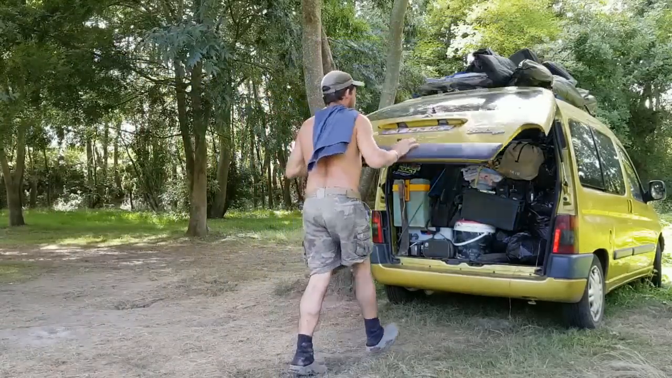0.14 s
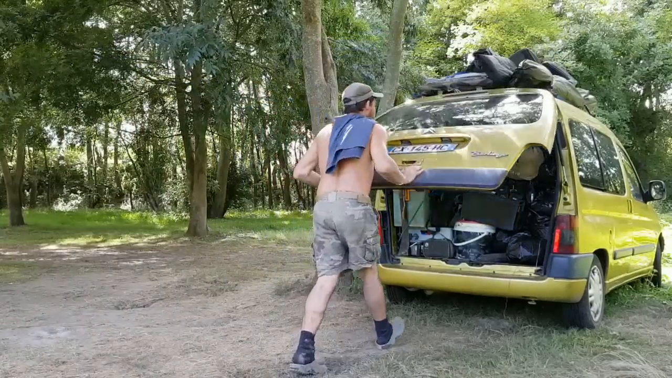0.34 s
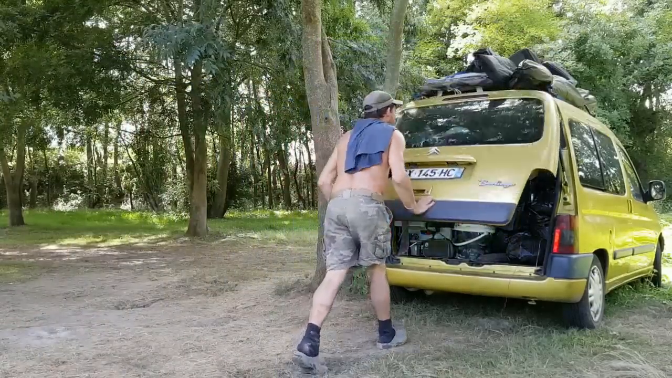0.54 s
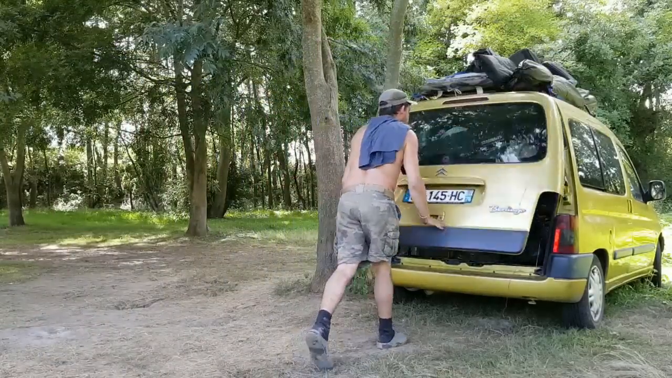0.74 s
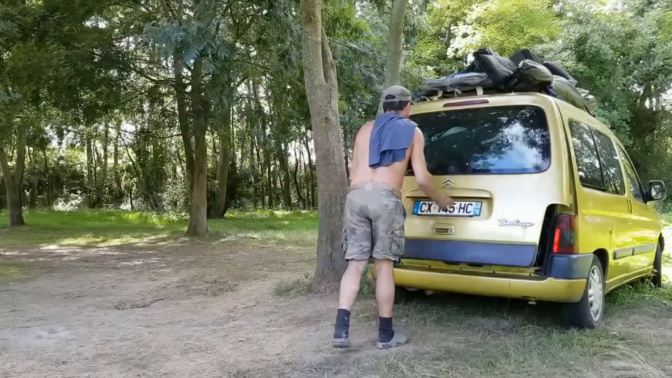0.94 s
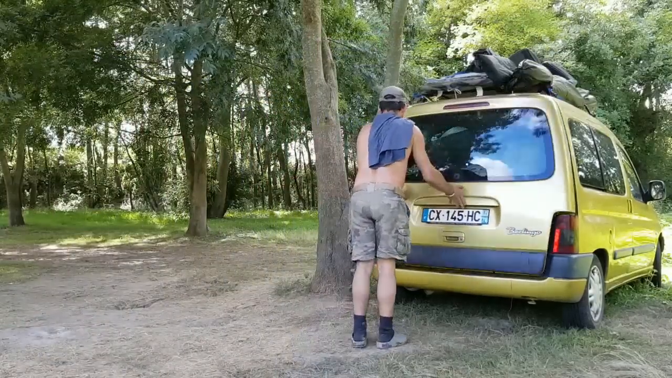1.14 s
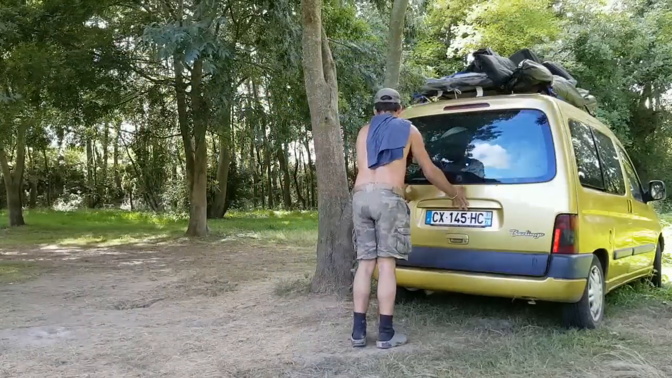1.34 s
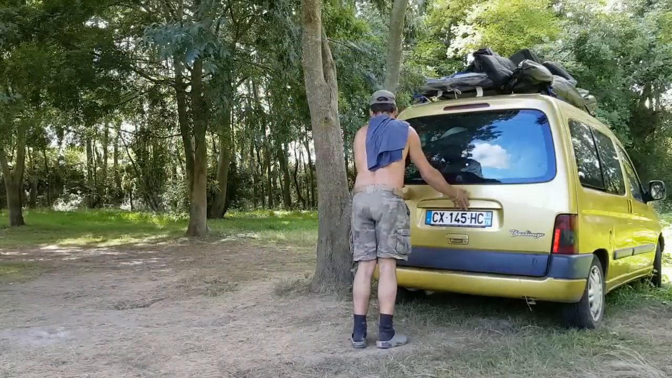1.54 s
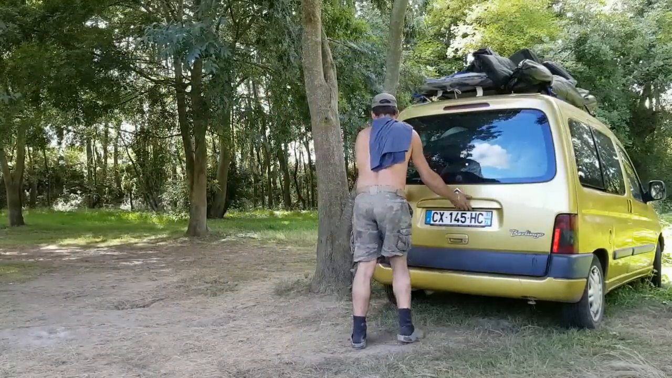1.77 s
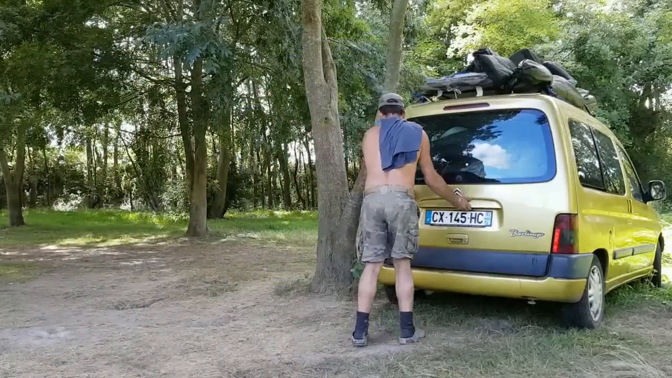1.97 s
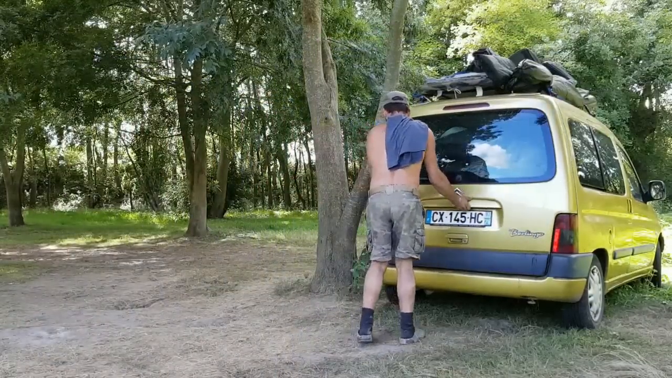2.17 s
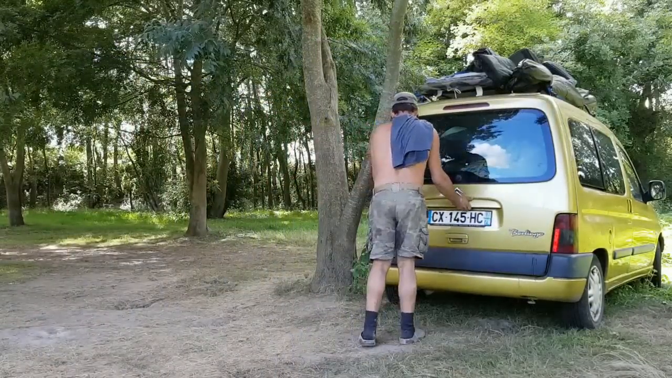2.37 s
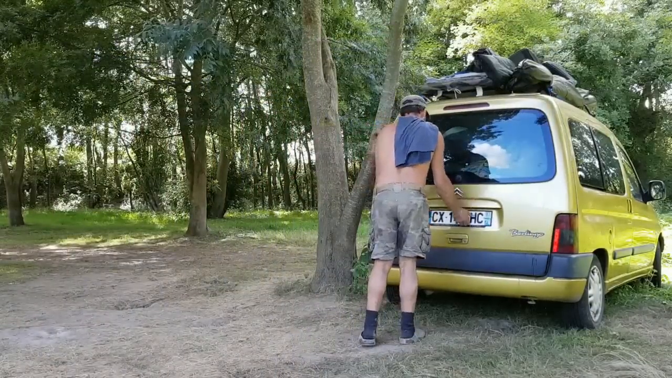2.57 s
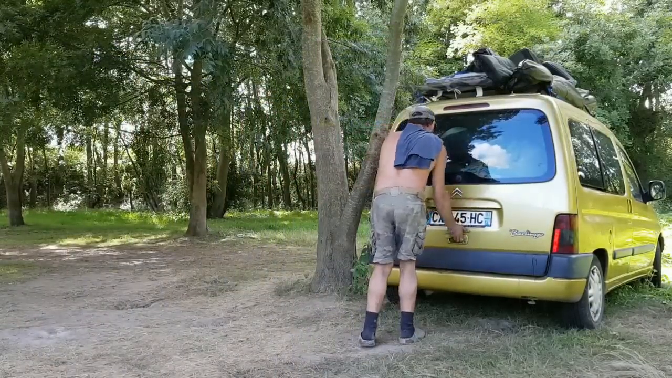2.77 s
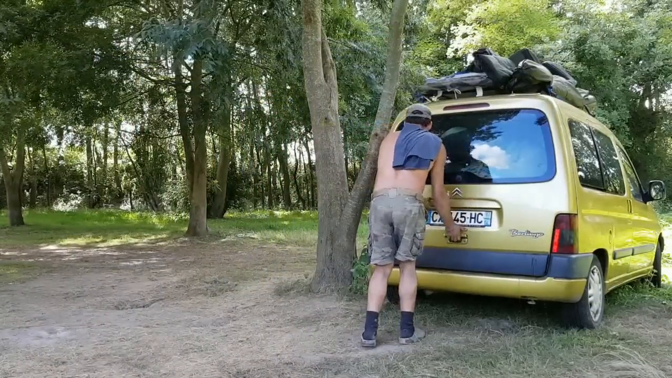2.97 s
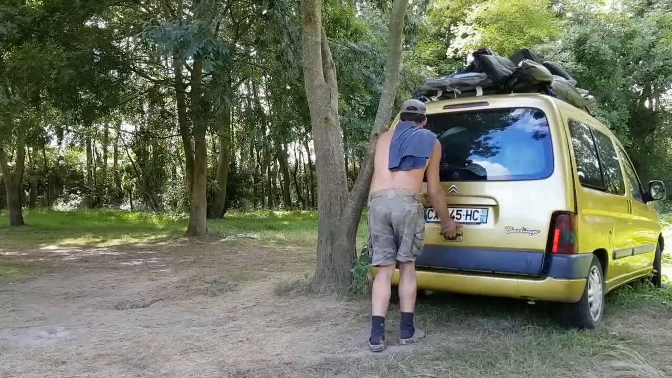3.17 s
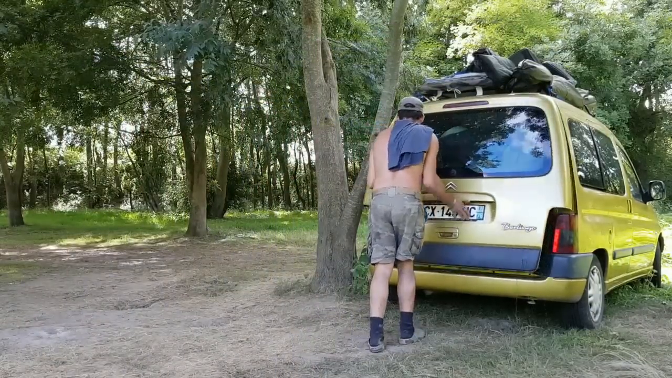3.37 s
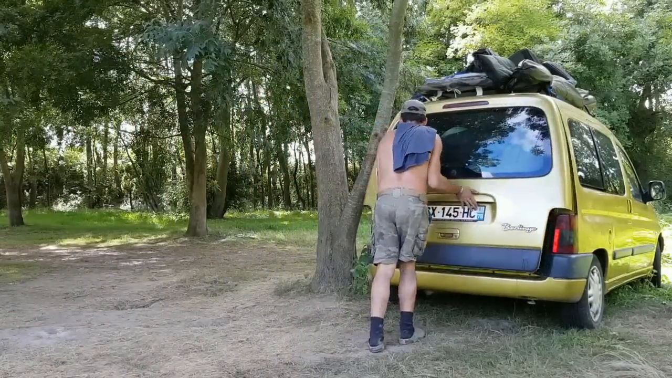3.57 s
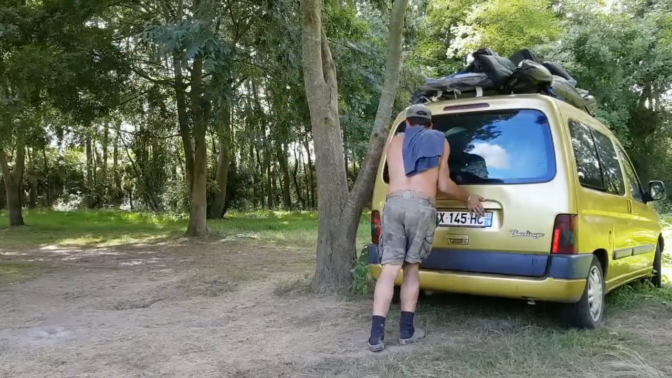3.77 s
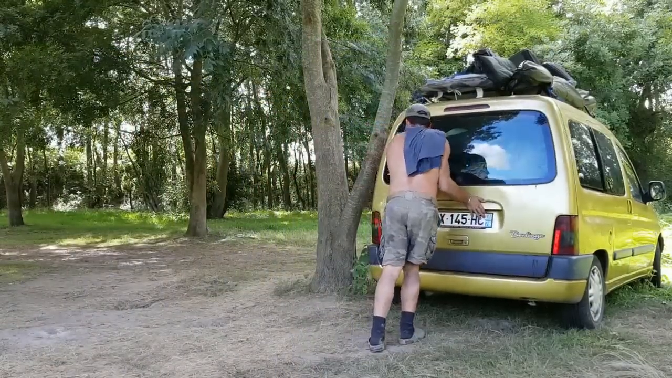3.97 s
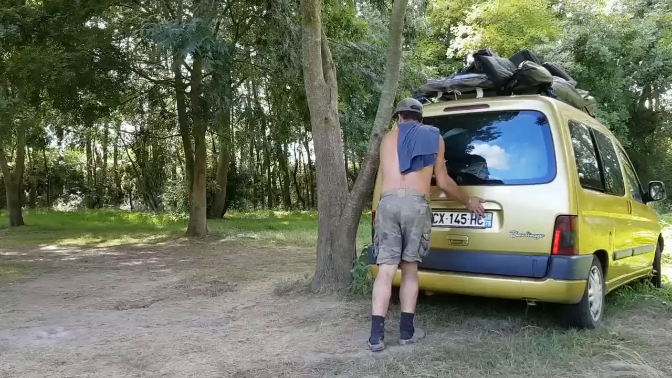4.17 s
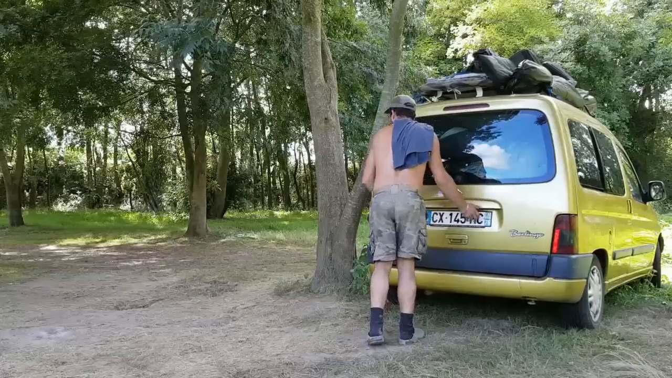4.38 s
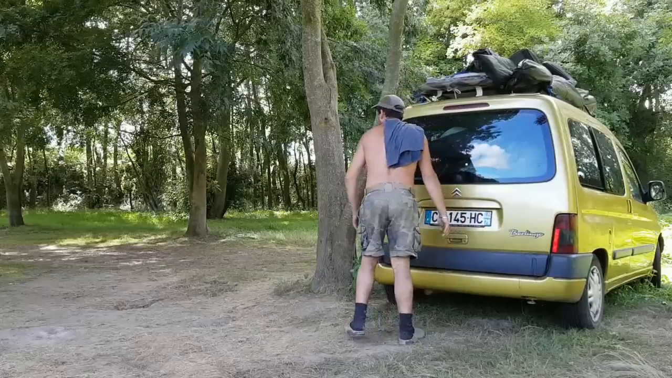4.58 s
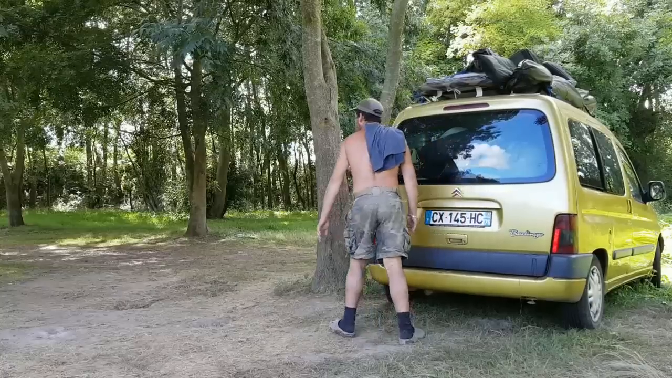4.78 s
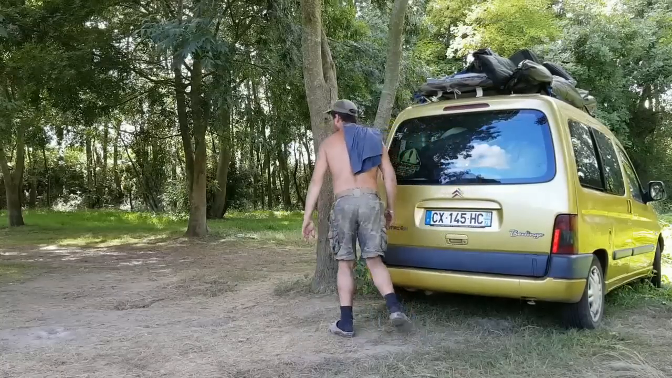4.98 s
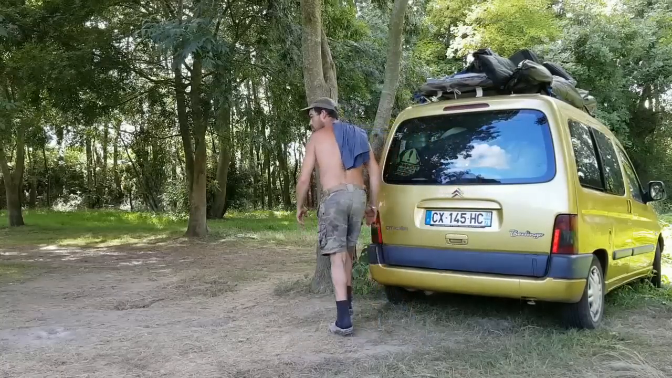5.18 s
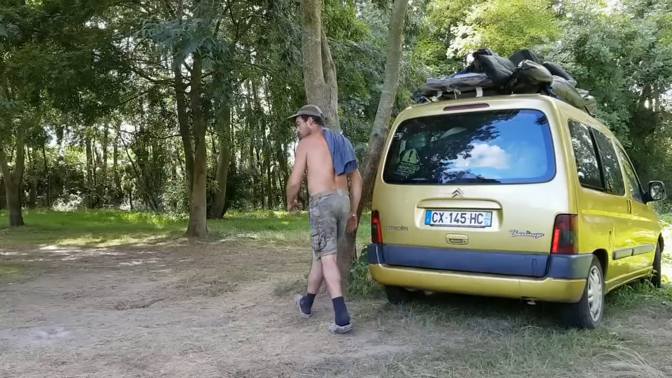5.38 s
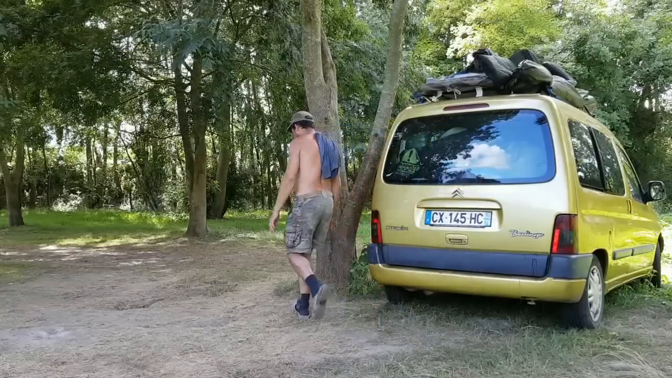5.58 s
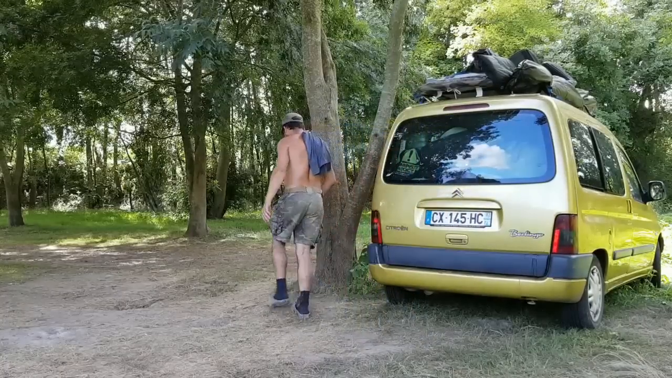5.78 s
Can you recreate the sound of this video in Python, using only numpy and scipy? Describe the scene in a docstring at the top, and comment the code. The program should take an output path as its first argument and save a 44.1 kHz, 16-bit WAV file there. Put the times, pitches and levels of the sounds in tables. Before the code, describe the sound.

A stereo outdoor scene in a wood, the van a few metres away, almost central. A steady, soft, distant rush, slightly left, runs throughout with leaves, faint hiss, light breeze and a few low microphone bumps, near 0.4, 1.0 and 1.8 s; faint rustles come at 0.2 and 1.9 s. At 1.35 s the tailgate slams: a quick seal brush and catch click, then a hard, dry sheet-metal bang with short trim chatter and a thin scattered tail from the trees. Small birds whistle briefly in gliding notes between 0.7 and 1.9 s, at 3.3 s and near 5.5 s. At 3.03 to 3.1 s the latch clicks and clunks, and at 3.4 s gives a sharper, louder clack with a hinge knock. At 3.89 s comes a second slam, fuller and deeper, with a short hollow cabin boom. A faint click follows at 4.0 s, then a dull low pop at 4.17 s. Afterwards only rush, rising leaves and breeze remain until 5.8 s.

```python
"""In a wood, a van's tailgate is slammed a few metres away, unlatched again, slammed harder and pushed home.
Each contact of seal, latch and trim excites the steel: dense noise bands for sheet metal, sines for its main modes.
Low decaying sines boom in the shut cabin, and a noise tail scatters door and birds back from the trees.
Around it, shaped noise makes a steady distant rush, leaves, rustles, hiss and a light breeze on the microphone;
a few small birds whistle in gliding sines, and soft low bumps touch the microphone."""
import sys
import numpy as np
from scipy import signal
from scipy.fft import rfft, irfft, next_fast_len
from scipy.io import wavfile
from scipy.ndimage import uniform_filter1d, map_coordinates

SR = 44100
rng = np.random.default_rng(int(sys.argv[2]) if len(sys.argv) > 2 else 0)


def unload_audio(sound):
    """Save the sound as a 16-bit wav file, at the path given as the first command line argument."""
    columns = np.transpose(np.atleast_2d(sound))
    # keep every value between -1 and 1, then stretch to whole-number steps
    steps = np.round(np.clip(columns, -1, 1) * 32767)
    wavfile.write(sys.argv[1], SR, steps.astype(np.int16))


N = 256662
TIME = np.arange(N) / SR


def amp(db):
    """Decibels to gain."""
    return 10 ** (np.asarray(db) / 20)


def unit(x):
    """x at rms 1."""
    return x / np.sqrt(np.mean(x ** 2) + 1e-20)


def along(points, hz):
    """Read a curve of (Hz, value) points on a log frequency axis."""
    point_hz, values = np.transpose(points)
    return np.interp(np.log(hz + 1), np.log(point_hz + 1), values)


def curve(rows):
    """Join (seconds, value) rows with straight lines, one value per sample."""
    return np.interp(TIME, *np.transpose(rows))


def wobble(rate):
    """A smooth random curve, rate knots a second."""
    knots = rng.standard_normal(int(N * rate / SR) + 4)
    return map_coordinates(knots, [TIME * rate])


def filtered(x, response):
    """x shaped by a complex response of frequency, padded so the end does not wrap round."""
    n = x.shape[-1]
    padded = next_fast_len(n + 4096)
    return irfft(rfft(x, padded) * response(np.fft.rfftfreq(padded, 1 / SR)), padded)[..., :n]


def add(track, s, x):
    """Mix x into the track from time s on."""
    part = track[..., round(s * SR):][..., :x.shape[-1]]
    part += x[..., :part.shape[-1]]


def noise_pair(alike, size):
    """White stereo noise whose left-right correlation follows a curve of frequency."""
    def mid_side_gains(hz):
        turn = np.arccos(np.clip(along(alike, hz), -1, 1)) / 2
        return np.array([np.cos(turn), np.sin(turn)])

    mid, side = filtered(rng.standard_normal((2, size)), mid_side_gains)
    return np.array([mid + side, mid - side])


def rush(spectrum, alike, patchy_db=0):
    """Coloured stereo noise of rms 1, with patches of random gain in time and frequency."""
    z = signal.stft(noise_pair(alike, N), nperseg=512)[2]
    patches = uniform_filter1d(rng.standard_normal(z.shape[1:]), size=4, axis=0)  # over frequency
    patches = uniform_filter1d(patches, size=7, axis=1)  # over time
    pair = signal.istft(z * amp(patchy_db * unit(patches)), nperseg=512)[1][:, :N]
    return unit(filtered(pair, lambda hz: amp(along(spectrum, hz))))


def from_side(x, lag_ms):
    """A source on the right reaches the left side later; a negative lag puts it on the left."""
    return filtered(x, lambda hz: np.exp(np.outer([-1, 1], 1j * np.pi * hz * lag_ms / 1000)))


# Colours of distant rush, leaves, breeze and hiss. Each row: frequency in Hz, relative level in dB per Hz.
RUSH_COLOUR = [(70, -14), (150, -31), (220, -22.5), (350, -5), (530, -2), (780, 0), (1030, 1.5),
               (1250, -3.5), (2150, -21), (3500, -38), (6000, -78)]
LEAVES_COLOUR = [(700, -34), (1500, 7.5), (2100, 2.5), (3000, -10), (4500, -52.5), (8000, -42)]
BREEZE_COLOUR = [(12, -14), (25, -6.5), (45, 1), (65, 3.5), (110, -3.5), (160, -8.5), (260, -12.5),
                 (400, -22.5), (700, -60)]
HISS_COLOUR = [(2060, -21), (3500, -1), (4340, -1.5), (5780, -4.5), (7560, -1), (11400, -4.5), (15100, -4),
               (16000, -17)]
# Stereo width of rush and leaves. Each row: frequency in Hz, left-right correlation (1 is mono).
RUSH_ALIKE = [(100, 0.81), (400, 1), (900, 1), (1600, 0.12), (4000, 0.16)]
# Swells of rush, leaves and breeze. Each row: time in seconds, level in dB before the gain below.
RUSH_SWELL = [(0.0, -50.5), (3.72, -47.5), (4.86, -49.5), (5.58, -45.0), (5.8, -46.0)]
LEAVES_SWELL = [(0.0, -65.0), (1.8, -68.5), (1.92, -63.0), (2.34, -71.5), (3.0, -64.0), (4.08, -70.0),
                (4.68, -70.5), (4.86, -63.0), (5.8, -60.5)]
BREEZE_SWELL = [(0.0, -46.5), (0.18, -50.0), (0.42, -44.5), (0.66, -61.0), (1.2, -47.0), (1.62, -56.0),
                (1.86, -45.5), (2.04, -58.5), (2.88, -56.5), (3.0, -61.0), (3.6, -51.5), (4.8, -59.5),
                (5.34, -42.5), (5.8, -45.0)]
RUSH_DB, LEAVES_DB, BREEZE_DB = 3.4, 4.4, .7  # gain of each over its swell
# Clothes and dry grass. Each row: centre in seconds, level in dB before a 3.5 dB lift, half length in seconds.
RUSTLES = [(0.187, -66, 0.055), (1.94, -65.5, 0.09), (2.63, -74, .08)]


def outdoors():
    """Shaped noises: a distant rush and leaves from the left, breeze on the microphone, rustles and hiss."""
    far_level = amp(RUSH_DB + curve(RUSH_SWELL) + 0.14 * wobble(6.6))
    far = far_level * rush(RUSH_COLOUR, RUSH_ALIKE, patchy_db=1.5)
    leaves = amp(LEAVES_DB + curve(LEAVES_SWELL)) * rush(LEAVES_COLOUR, RUSH_ALIKE, patchy_db=2.3)
    breeze_level = amp(BREEZE_DB + curve(BREEZE_SWELL) + 0.6 * wobble(19))
    breeze = breeze_level * rush(BREEZE_COLOUR, [(60, 0.68)], patchy_db=1.8)
    touch = sum(amp(db) * np.exp(-((TIME - s) / half) ** 2) for s, db, half in RUSTLES)
    dry_grass = rush([(1000, 4), (4000, 0), (9000, -5), (15000, -12)], [(4000, 0.21)], patchy_db=2)
    rustle = touch * amp(3.5) * dry_grass
    hiss = amp(-69.5) * rush(HISS_COLOUR, [(4000, 0.023)], patchy_db=1.5)
    return from_side(far + leaves, lag_ms=-0.3) + breeze + rustle + hiss


def pushes(rows):
    """Low pressure swings of a cycle or two, each a cosine under a bell-shaped envelope."""
    out = 0
    for s, db, hz, half in rows:
        since = TIME - s
        out = out - amp(db) * np.cos(2 * np.pi * hz * since) * np.exp(-(since / half) ** 2)
    return out


# Soft bumps. Each row: centre in seconds, peak in dB, pitch in Hz, half length in seconds.
BUMPS = [(.42, -45, 79, 0.0086), (.99, -36, 96, 0.0075), (1.83, -34.5, 75, 0.011)]


def microphone_bumps():
    """Soft low bumps push on the microphone."""
    return pushes(BUMPS)


# Bird notes. Each row: start in seconds, length in seconds, middle pitch in Hz, glide in octaves, level in dB.
BIRD_NOTES = [(.747, .09, 2460, .11, -65.5), (1.046, .063, 3850, -.13, -64.5),
              (1.135, .091, 3720, .19, -60.5), (1.595, .095, 3320, -.3, -59),
              (1.86, .105, 3480, -.15, -61.5), (3.325, .034, 4500, .35, -58.5), (5.38, .04, 3000, .16, -68),
              (5.545, .055, 3520, .2, -60.5)]
BIRD_ARCH = .05  # both ends of a note sag by this many octaves


def birds():
    """Short gliding whistles from the trees, with a fast flutter in pitch and strength."""
    out, tremble = np.zeros(N), wobble(500)
    for s, length, hz, glide, db in BIRD_NOTES:
        u = np.linspace(0, 1, int(length * SR))  # place within the note
        flutter = tremble[round(s * SR):][:len(u)]
        octaves = glide * (u - .5) - BIRD_ARCH * (2 * u - 1) ** 2
        pitch = hz * 2 ** octaves * (1 + .022 * flutter)
        whistle = np.sin(2 * np.pi * np.cumsum(pitch) / SR)
        add(out, s, amp(db + 2 * flutter) * np.sin(np.pi * u) ** 2 * whistle)
    return out


# Decay of the scattered sound. Each row: frequency in Hz, t60 in seconds.
WOOD_T60 = [(100, 0.72), (500, 0.49), (2500, 0.45), (6000, 0.38), (14000, 0.29)]
# Its colour. Each row: frequency in Hz, relative level in dB.
WOOD_COLOUR = [(100, -4), (500, -2), (1200, -3), (3000, 2), (8000, 6.5), (15000, 16)]


def wood(x, build_up):
    """Trunks and leaves scatter a thin tail that builds up within a few milliseconds; its treble dies first."""
    noise = noise_pair([(200, 1.0), (700, 0.78), (2000, 0.048)], SR)
    hz, t, z = signal.stft(noise, SR, nperseg=256)
    fade = amp(-60 * t / along(WOOD_T60, hz)[:, None]) * (1 - np.exp(-t / build_up))
    tail = signal.istft(z * fade, SR, nperseg=256)[1]
    tail = filtered(tail / np.linalg.norm(tail[0]), lambda hz: amp(along(WOOD_COLOUR, hz)))
    return signal.fftconvolve(np.atleast_2d(x), tail, axes=1)[:, :N]


def rattle(size, rate):
    """Loose trim chatters: a spiky random curve, rate knots a second."""
    knots = rng.exponential(size=int(size * rate / SR) + 2) - 1
    return np.interp(np.arange(size) * rate / SR, np.arange(len(knots)), knots)


# Sheet steel and trim. Each row: band centre in Hz, relative level in dB, t60 in seconds before the ring factor.
SHEET_BANDS = [(143, -8.5, 0.24), (219, -8.5, 0.17), (410, -1, 0.14), (670, 0.5, 0.073), (1100, 1.5, 0.083),
               (1820, -6, 0.12), (3240, -3.5, 0.13), (5100, -9, 0.15), (8600, -7.5, 0.071),
               (13000, -13, 0.055), (16300, -19, .04)]
# Its stereo width. Each row: frequency in Hz, left-right correlation.
SHEET_ALIKE = [(300, 1), (900, .95), (2500, 0.84), (4500, 0.52), (8000, 0.46), (12000, 0.22)]


def sheet(t, colour, ring, snap_db, snap_t60, rattle_db):
    """Countless overlapping modes: a short snap, then each band dies at its own speed while the trim chatters."""
    centres, levels, t60s = np.transpose(SHEET_BANDS)
    knots_hz = np.r_[centres[0] / 2, centres]  # the lowest band fades out an octave down

    def band_gains(hz):
        peaks = np.eye(len(knots_hz))[1:]  # each band peaks at its centre and is nil at its neighbours'
        shares = np.array([along(np.c_[knots_hz, peak], hz) for peak in peaks])
        return np.sqrt(shares)[:, None]

    bands = filtered(noise_pair(SHEET_ALIKE, len(t)), band_gains)
    chatter = rattle_db * np.minimum(rattle(len(t), rate=728), 3)
    out = 0
    for band, hz, db, t60 in zip(bands, centres, levels, t60s):
        bright = hz / (hz + 2000)  # snap and chatter live in the treble
        fade = amp(-60 * t / (t60 * ring)) + bright * amp(snap_db - 60 * t / snap_t60)
        shaken = unit(band * fade * amp(bright * chatter))
        out = out + amp(db + colour(hz)) * shaken * np.sqrt(np.mean(fade ** 2))
    return out


# Main modes of the tailgate. Each row: unstrained pitch in Hz, relative level in dB,
# t60 in seconds before the ring factor.
PANEL_MODES = [(130.4, -6, 0.24), (164, -10.5, 0.47), (235, -9, 0.27), (279, -8, 0.34), (334.8, -8, .26),
               (425.5, -3.5, 0.22), (477, 0, 0.11), (588.4, -12.5, 0.38), (669.4, -6.5, 0.23),
               (926, -4, 0.12), (1076, -8, 0.23), (1197, -7, 0.16), (1456, -20, 0.45), (1846, -4.5, 0.13),
               (2010, -6, 0.23), (2780, -10, 0.17)]


def panel(t, colour, ring, scatter_db):
    """The door's strongest modes as decaying sines, struck at a new spot each time."""
    hz, db, t60 = np.transpose(PANEL_MODES)
    strength = amp(db + colour(hz) + scatter_db * rng.standard_normal(len(hz)))
    phase = rng.uniform(0, 2 * np.pi, (len(hz), 1))
    strained = hz * (1 + .012 * rng.standard_normal(len(hz)))  # the seal's pressure shifts each mode a little
    fade = amp(-60 * t / (ring * t60[:, None]))
    return strength @ (np.sin(2 * np.pi * np.outer(strained, t) + phase) * fade)


def strike(s, level_db, touch, heavy_db=0):
    """One contact shakes the door's sheet steel and main modes; hard parts crack, padded ones thud."""
    db, thud_db, clang_db, crack_db, rise, ring = touch
    out, t = np.zeros((2, N)), np.arange(SR // 4) / SR

    def colour(hz):
        return along([(190, thud_db + heavy_db), (480, 0), (1200, clang_db), (6000, crack_db)], hz)

    blow = sheet(t, colour, ring, snap_db=-7.5, snap_t60=0.014, rattle_db=2.5)
    blow = blow + amp(-2.5) * panel(t, colour, ring, scatter_db=0.5)
    onset = 1 - np.exp(-t / max(rise, 1e-4))
    add(out, s, amp(level_db + db - 1) * blow * onset)
    return out


# Slams. Each row: main blow in seconds, relative level in dB, closing speed in m/s, extra thud in dB,
# relative trim rattle in dB, gain of the cabin boom in dB.
SLAMS = [(1.3467, -14.1, 1, -3.5, -30, -35), (3.8854, -15.5, 1.55, 1, -26, -13)]
# How far from home, in metres, the door meets the outer and the inner lip of the seal.
SEAL_GAPS_M = (.04, .027)
CATCH_LEAD_S, SEAT_LAG_S = .0075, .006  # the safety catch comes before the main blow, the frame after it
TRIM_FIRST_S, TRIM_GAP_S, TRIM_LOSS_DB = .035, .0245, 3.5  # loose trim bounces on after a slam
# How each part touches. Each holds: relative level in dB, thud (bass), clang (upper middle) and crack (treble)
# in dB against the middle, rise time constant in seconds, factor on the ring length.
OUTER_LIP = (-21, 4, .5, -20, .003, 1.2)
INNER_LIP = (-18.5, 2, 7.5, -8.5, .003, 1.25)
SAFETY_CATCH = (-6.5, -3, 1.5, -11.5, .0012, .66)
STRIKER = (0, -6.5, -3, -6.5, .0017, .56)
FRAME = (-.5, -3, -4.5, -17, .0024, .7)
TRIM = (0, .5, -3, -12.5, .003, .9)


def tailgate():
    """A slam brushes seal and safety catch (harder and closer to the main blow at speed for the seal), hits
    striker and frame, and the trim bounces three times, ever weaker."""
    out = 0
    for s, db, speed, heavy_db, trim_db, _ in SLAMS:
        outer, inner = np.array(SEAL_GAPS_M) / speed  # seconds before the main blow
        brush_db = db + 20 * np.log10(speed)
        contacts = [(s - outer, brush_db, OUTER_LIP),
                    (s - inner, brush_db, INNER_LIP),
                    (s - CATCH_LEAD_S, brush_db, SAFETY_CATCH),
                    (s, db, STRIKER),
                    (s + SEAT_LAG_S, db, FRAME)]
        bounces = [(s + TRIM_FIRST_S + k * TRIM_GAP_S, trim_db - k * TRIM_LOSS_DB, TRIM) for k in range(3)]
        out = out + sum(strike(*contact, heavy_db) for contact in contacts + bounces)
    return out


# The shut cabin's resonances. Each row: pitch in Hz, relative level in dB, t60 in seconds.
CABIN_MODES = [(32, -11, .42), (52, -7, .2), (70, -4, .22), (83, -6, .24), (331, 3.5, .16)]
BOOM_RISE_S = .009


def boom():
    """Once the safety catch is reached the seal is tight, and the door pumps the air in the van."""
    out, t = np.zeros(N), np.arange(SR // 2) / SR
    ring = sum(amp(db - 60 * t / t60) * np.sin(2 * np.pi * hz * t) for hz, db, t60 in CABIN_MODES)
    ring = ring * (1 - np.exp(-t / BOOM_RISE_S))
    for s, *_, boom_db in SLAMS:
        add(out, s - CATCH_LEAD_S, amp(boom_db) * ring)
    return out


# The latch lets go or snaps shut, then the door's weight knocks in its hinges. Each row: start in seconds,
# relative level in dB, thud, clang and crack in dB against the middle, gain of the catch's ring in dB,
# delay of the knock in seconds, relative level of the knock in dB.
LATCH_MOVES = [(1.3665, -28, -2, 1, .5, -45, .034, -33.5), (3.0316, -45, -11, 5, -6, -37.5, .0064, -32.5),
               (3.078, -30.5, 8.5, 4.5, .5, -30.5, .0155, -23.6),
               (3.4043, -18.4, -12, 2, -9.3, -29.5, .0153, -23.2),
               (3.994, -43, 2, -2, -4.5, -60, .015, -47), (4.169, -36, 4, 2.5, -26, -54, .015, -33.5)]
# Modes of the small catch. Each row: pitch in Hz, relative level in dB, t60 in seconds.
CATCH_MODES = [(1700, 5, 0.031), (2410, 5, 0.021), (3340, -13, 0.025), (3650, 0.5, 0.02), (4570, -5, .025),
               (7410, -12, .035)]


def latch():
    """The small steel catch clicks in decaying sines as it lets go and snaps over the striker."""
    out, t = np.zeros(N), np.arange(SR // 10) / SR
    ring = sum(amp(level - 60 * t / t60) * np.sin(2 * np.pi * hz * t) for hz, level, t60 in CATCH_MODES)
    for s, *_, ring_db, _, _ in LATCH_MOVES:
        add(out, s, amp(ring_db) * ring)
    return out


# The hinges' touch: relative level in dB, thud, clang and crack in dB, rise in seconds, ring length factor.
HINGES = (0, -1, -13, -21.5, .001, .97)
LATCH_RISE_S, LATCH_RING = .0005, .63  # steel on steel: rise, ring length factor


def latch_knocks():
    """Each move of the latch cracks through the door, which then knocks in its hinges."""
    out = 0
    for s, db, thud_db, clang_db, crack_db, _, delay, knock_db in LATCH_MOVES:
        crack = strike(s, db, (0, thud_db, clang_db, crack_db, LATCH_RISE_S, LATCH_RING))
        out = out + crack + strike(s + delay, knock_db, HINGES)
    return out


# Under the last push the steel skin flexes, then pops.
# Each row: centre in seconds, peak in dB, pitch in Hz, half length in seconds.
FLEXES = [(4.147, -27, 320, .013), (4.1674, -16, 154, .0055)]
# The palm's touch: relative level in dB, thud, clang and crack in dB, rise in seconds, ring length factor.
PALM = (-10, 4.5, -8, -30, .008, .8)


def press():
    """A palm pushes the door home; each flex of the skin shakes it softly."""
    return sum(strike(s - half, db, PALM) for s, db, _, half in FLEXES)


def skin_flexes():
    """The flexing skin itself pushes the air in short swings."""
    return pushes(FLEXES)


def scene():
    """The van stands a little to the right, among the trees."""
    door = tailgate() + latch_knocks() + press()
    song = birds()
    van = from_side(door + latch() + boom() + skin_flexes(), lag_ms=0.093)
    van = van + amp(-18.5) * wood(door, build_up=0.0053)
    trees = song + amp(-7) * wood(song, build_up=.02)
    balance = amp([[.25], [-.25]])  # left a touch louder than right
    return (van + trees + outdoors() + microphone_bumps()) * balance


TOP_HZ = 15900


def record(dry):
    """The microphone's band limit: nothing passes from TOP_HZ up."""
    return filtered(dry, lambda hz: hz < TOP_HZ)


dry = scene()
out = record(dry)
unload_audio(out)
```